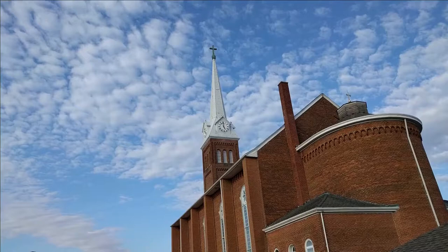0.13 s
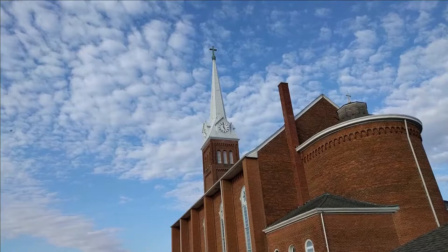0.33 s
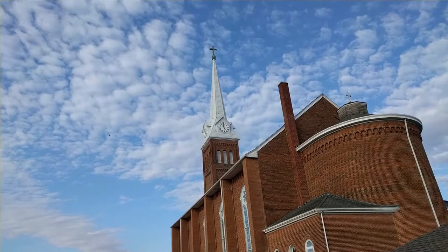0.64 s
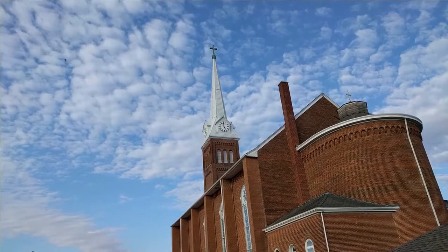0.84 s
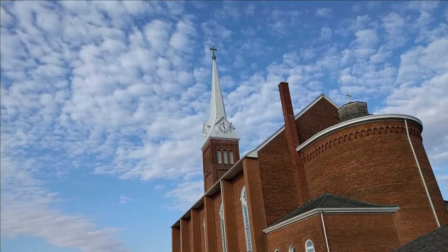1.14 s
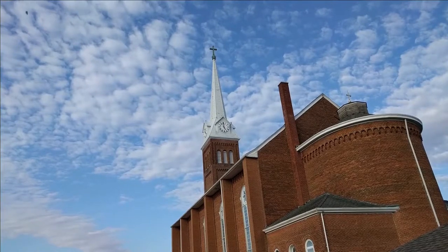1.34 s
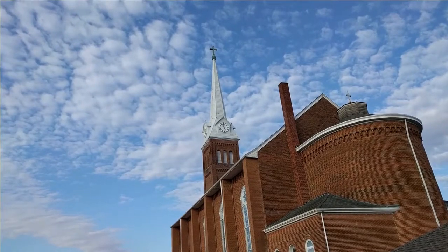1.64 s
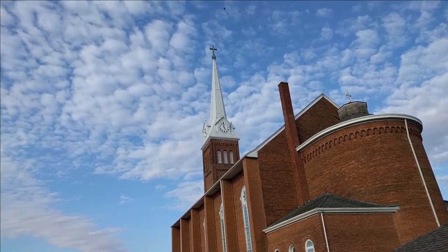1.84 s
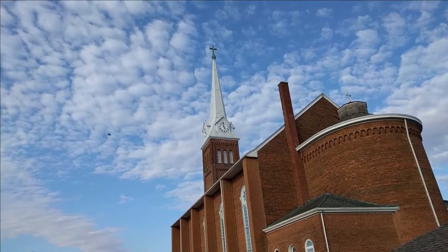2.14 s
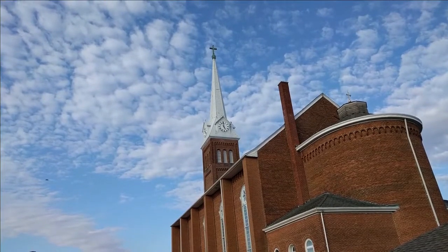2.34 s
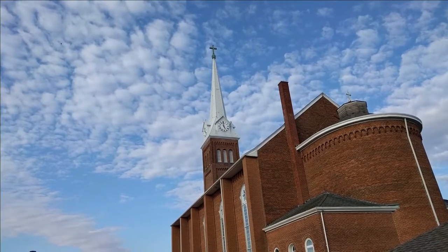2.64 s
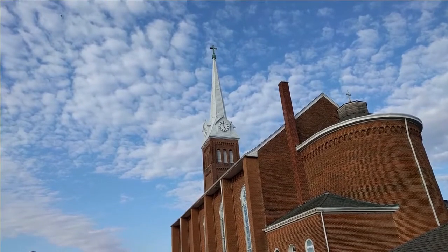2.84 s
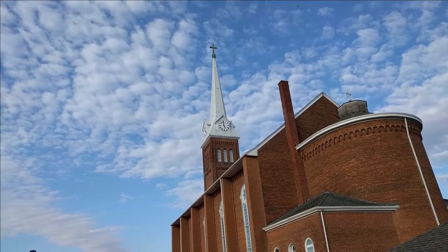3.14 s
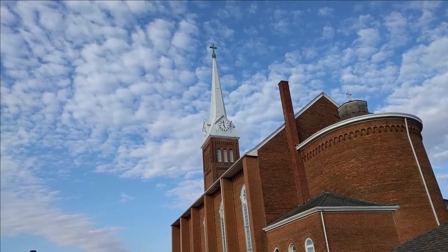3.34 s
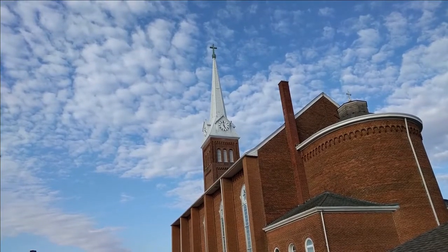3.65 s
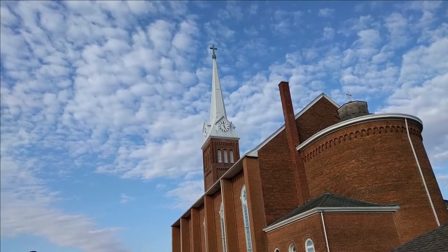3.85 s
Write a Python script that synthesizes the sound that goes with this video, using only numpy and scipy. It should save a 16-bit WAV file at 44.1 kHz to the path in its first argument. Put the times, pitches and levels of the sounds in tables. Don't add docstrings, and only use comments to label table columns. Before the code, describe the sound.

A distant church bell is struck once and rings on over a quiet town with birds.

```python
import sys
import numpy as np
from scipy import signal
from scipy.fft import rfft, irfft
from scipy.io import wavfile
from scipy.ndimage import uniform_filter1d

SR = 44100
rng = np.random.default_rng(int(sys.argv[2]) if len(sys.argv) > 2 else 0)


def output_pcm(signal):
    pcm = np.clip(np.atleast_2d(signal).T, -1, 1) * 32767
    wavfile.write(sys.argv[1], SR, np.round(pcm).astype(np.int16))


def invert_db(x):
    u = np.asarray(x, float) / 20
    return 10 ** u


N = 176400
STRIKE_S = 2.43


def read(points, hz):
    f, value = np.transpose(points)
    return np.interp(np.log(hz + 1), np.log(f + 1), value)


def evened(x):
    return x / np.sqrt(np.mean(x ** 2) + 1e-20)


def coloured(shape):
    spectrum = rfft(rng.standard_normal(N))
    return evened(irfft(spectrum * invert_db(read(shape, np.fft.rfftfreq(N, 1 / SR))), N))


def wander(rate, count):
    t = np.arange(count)[:, None] / SR
    f = rate * np.geomspace(.1, 1, num=8)
    slow = np.sin(2 * np.pi * (f * t[::100] + rng.random(8))) @ (1 / np.sqrt(f))
    return np.interp(t[:, 0], t[::100, 0], evened(slow))


def glide(hz):
    return np.sin(2 * np.pi * np.cumsum(hz) / SR)


def add(mix, s, sound):
    part = mix[round(s * SR):][:len(sound)]
    part += sound[:len(part)]


def rumble():
    # [f/Hz, level/dB per Hz]
    rumble_colour = [(12, -43), (20, -35), (22, -40), (40, -5.5), (64, 0), (97, -8.5), (149, -15),
                     (400, -38.5), (520, -39), (880, -120)]
    # [t/s, level/dB]
    gusts = [
        (0.13, -53),
        (0.2, -56.5),
        (3.23, -53),
        (3.36, -55),
        (3.54, -51),
        (3.59, -59),
        (3.68, -50.5),
        (3.72, -55.5),
        (4.0, -54.5),
    ]
    # [t/s, depth/dB, half width/s]
    lulls = [
        (.235, -4.5, 0.018),
        (.28, -15, 0.013),
        (.4, -1, 0.072),
        (.555, -12, 0.016),
        (.81, -13, 0.013),
        (1.42, -2, 0.023),
        (2.17, -13, 0.014),
        (3.59, -2, .03),
    ]
    skew = 0.097
    t = np.arange(N) / SR
    low = coloured(rumble_colour)
    low = low / np.sqrt(uniform_filter1d(low ** 2, size=5000) + 0.12)
    level_db = np.interp(t, *np.transpose(gusts))
    for s, db, half in lulls:
        level_db = level_db + db * np.exp(-((t - s) / half) ** 2)
    cut = signal.butter(2, 36, "high", fs=SR, output="sos")
    even_part = signal.sosfilt(cut, low[::-1])[::-1]
    lopsided_part = signal.sosfilt(cut, low ** 2)
    return invert_db(level_db) * evened(even_part - skew * lopsided_part)


def town():
    # [f/Hz, level/dB per Hz]
    town_colour = [(120, -28), (200, 2), (379, -7.5), (573, -8), (1310, -15.5), (1640, -21.5), (1820, -28),
                   (6000, -33), (7800, -94), (13200, -120)]
    town_db = -67.5
    lull_s, lull_db, lull_half_s = 0.13, -3, 0.12
    lull = lull_db * np.exp(-((np.arange(N) / SR - lull_s) / lull_half_s) ** 2)
    return invert_db(town_db + lull) * coloured(town_colour)


def high_bands():
    # [f/Hz, width/Hz, level/dB]
    fuzzy_bands = [
        (7550, 200, -82.5),
        (7100, 400, -86),
    ]
    hz = np.fft.rfftfreq(N, 1 / SR)
    out = np.zeros(N)
    for f, width, db in fuzzy_bands:
        resonance = 1 / (1 + (2 * (hz - f) / width) ** 2)
        band = irfft(rfft(rng.standard_normal(N)) * resonance, N)
        out += invert_db(db + 2.4 * wander(23.0, count=N)) * evened(band)
    return out


def whistle():
    # [t/s, f/Hz, level/dB]
    whistle_course = [
        (0.885, 3950, -88),
        (0.895, 4549, -71),
        (0.902, 4550, -61.5),
        (0.937, 4374, -53.5),
        (0.985, 4346, -56),
        (1.063, 4184, -62.5),
        (1.111, 4170, -100),
        (1.12, 4300, -82),
    ]
    s, hz, db = np.transpose(whistle_course)
    t = np.arange(s[0], s[-1], 1 / SR)
    edge = np.minimum(1, np.minimum(t - s[0], s[-1] - t) / 0.0072)
    level_db = np.interp(t, s, db) + 0.83 * wander(55.0, count=len(t))
    out = np.zeros(N)
    add(out, s[0], np.sqrt(2) * edge * invert_db(level_db) * glide(np.interp(t, s, hz)))
    return out


def chirps():
    # [t/s, length/s, from f/Hz, to f/Hz, level/dB]
    chirp_notes = [(.335, .016, 6700, 7300, -68), (.67, .2, 4170, 4350, -83), (1.12, .17, 4280, 4230, -84),
                   (1.215, .014, 4000, 4400, -72), (1.318, .024, 4050, 4600, -69),
                   (1.35, .025, 4900, 4950, -77), (1.24, .03, 5350, 5450, -81),
                   (1.455, .02, 4250, 4500, -76), (1.35, .012, 4100, 4400, -72),
                   (1.38, .055, 2750, 2720, -76), (1.425, .024, 4000, 4600, -69.5),
                   (1.545, .015, 4000, 4150, -74), (1.65, .03, 4080, 4180, -72),
                   (1.79, .012, 4000, 4100, -77), (1.675, .015, 4800, 5000, -77),
                   (1.76, .025, 3950, 4200, -73), (1.785, .016, 4900, 5300, -75),
                   (2.11, .03, 3500, 3200, -79), (2.185, .014, 5900, 7000, -71),
                   (3.05, .04, 4060, 4050, -78), (3.985, .015, 6200, 6900, -69)]
    out = np.zeros(N)
    for start, length, from_hz, to_hz, db in chirp_notes:
        u = np.arange(0, length, 1 / SR) / length
        blur = .014 * from_hz * wander(300., count=len(u) + 200)[:len(u)]
        blur *= min(1, .02 / length)
        swell = np.sqrt(2 * np.sin(np.pi * u))
        add(out, start, invert_db(db) * swell * glide(from_hz + (to_hz - from_hz) * u + blur))
    return out


def birds():
    calls = whistle() + chirps()
    t = np.arange(SR // 3) / SR
    echo = rng.standard_normal(len(t)) * invert_db(-60 * t / 0.28) * (t > .004)
    return calls + invert_db(-11) * signal.fftconvolve(calls, echo / np.linalg.norm(echo))[:N]


def ticks():
    # [t/s, peak level/dB, f/Hz, share of dull knock]
    body_ticks = [
        (.6352, -45, 7500, .1),
        (.6634, -42.5, 7500, .1),
        (.9576, -36, 7300, .3),
    ]
    out = np.zeros(N)
    t = np.arange(-24, 25) / SR
    for s, db, hz, dull in body_ticks:
        snap = (1 - 2 * (np.pi * hz * t) ** 2) * np.exp(-(np.pi * hz * t) ** 2)
        knock = np.cos(2 * np.pi * 1500 * t) * np.exp(-(t / .0002) ** 2)
        train = .13 * rng.standard_normal(90) * invert_db(-np.arange(90) * .2)
        train[[0, 7, 16, 20]] += [1, -.3, -.45, .35]
        add(out, s, invert_db(db) * np.convolve(train, snap + dull * knock))
    return out


def shimmer(hz, count):
    return 1.1 * hz / 2000 * wander(45., count=count)


def rim(t):
    # [f/Hz, peak level/dB, t60/s]
    rim_partials = [(215.26, -49.7, 90), (409.03, -50.7, 90), (486.85, -40, 9.9), (648.5, -64.5, 5.1),
                    (789.41, -41.8, 4), (1001.66, -49, 1.5), (1163.75, -53.5, 12), (1592.13, -39.8, 3.1),
                    (1800.87, -55, 2.2), (2062.94, -55, 10), (2437.07, -53.5, 1.74), (2563.19, -55.6, 3.15),
                    (3086.09, -49.5, 1.75), (3616.6, -63.5, 4.5)]
    # [split f/Hz, peak level/dB, t60/s, t after the blow when the pair cancels/s]
    rim_twins = [(-.25, -62.6, 90, -.15), (-.77, -55.4, 1.95, .46), (-.21, -46.7, 2.64, -.35),
                 (-1.06, -63.3, 6.2, .66), (-1.05, -53, 9.5, .96), (2, -76, 27, -.01), (-.9, -54, .9, .6),
                 (.8, -59.5, 6.9, 1.4), (2.1, -72, 5.6, -.07), (-1.06, -66, 6, .95),
                 (-1.2, -67.5, 2.9, .43), (.92, -57, 4, .3), (-13, -67, 2.2, .02), (1.35, -78, 2.4, .98)]
    # [partial index, t/s, step/dB]
    partial_steps = [(4, 2.58, 1.5), (4, 2.8, -2.5), (4, 2.97, -2), (4, 3.17, 5), (4, 3.38, 2.5),
                     (4, 3.58, -5.5), (6, 3.17, -9), (6, 3.35, -4), (6, 3.67, 8), (7, 2.67, 1.5),
                     (7, 2.95, -2.5), (7, 3.27, 3), (7, 3.37, 1), (7, 3.53, -5), (7, 3.66, -7), (8, 3.3, 7),
                     (9, 3.27, -19), (9, 3.4, 7), (11, 3.2, -2), (11, 3.4, -2), (11, 3.6, 4),
                     (12, 2.57, -2.5), (12, 3.37, 5), (13, 3.1, -5)]
    shade_db = np.zeros((len(rim_partials), len(t)))
    for k, s, db in partial_steps:
        shade_db[k] += db / (1 + np.exp((s - STRIKE_S - t) / .025))
    out = np.zeros(len(t))
    for shade, partial, twin in zip(shade_db, rim_partials, rim_twins):
        hz, db, t60 = partial
        split, twin_db, twin_t60, dip = twin
        phase = 2 * np.pi * (hz * t + rng.random())
        twin_phase = phase + 2 * np.pi * split * (t - dip)
        pair = invert_db(db - 60 * t / t60) * np.sin(phase)
        pair -= invert_db(twin_db - 60 * t / twin_t60) * np.sin(twin_phase)
        out += pair * invert_db(shade + shimmer(hz, len(t)))
    return out


def lesser_partials(t):
    # [f/Hz, peak level/dB, t60/s]
    weak_partials = [(1095.2, -56, 1.2), (1110.7, -64.5, 9), (1118.8, -60, 2.4), (1395.6, -67, 6.6),
                     (1505.4, -59, 1.9), (1868.9, -62, 1.3), (1898, -57, 1.4), (2017.5, -62, 2.2),
                     (2264, -60, .8), (2407.1, -59, 2.2), (2700.2, -57, .74), (2779, -63, 2.3),
                     (2808, -61, .9), (2928.7, -66.5, 2.2),
                     (1109.5, -54, .7), (1579, -63, .8), (1619, -63, .8), (1729, -68, .9), (1843, -69, 2.2),
                    (2014, -62, .5), (2122, -68, .9), (2533, -70, 2.5), (2859, -65.5, 1.3),
                    (3136, -62, 1.8), (3546, -70, 3), (3603, -66, 1.8),
                     (3105, -57, .7), (3562, -57, .8), (3654, -66, 2.2), (3679, -69, .7),
                         (3769, -67, 2.2), (3961, -64, .6), (4157, -59, 1.3), (4168, -71, .8),
                         (4237, -66, .6), (4395, -68, .5), (4494, -71, 2), (4694, -70, .7), (5118, -65, .6),
                         (5230, -73, .9)]
    out = np.zeros(len(t))
    for hz, db, t60 in weak_partials:
        level_db = db - 60 * t / t60 + shimmer(hz, len(t))
        out += invert_db(level_db) * np.sin(2 * np.pi * (hz * t + rng.random()))
    return out


def clang(t):
    # [f/Hz, level/dB]
    clang_colour = [(200, -18), (600, 6.5), (1500, 3), (2600, 5.5), (4000, 1), (5500, -12), (7300, -3),
                    (8200, -24)]
    # [f/Hz, t60/s]
    clang_decay = [(300, .27), (1500, .28), (4000, .38), (8000, .45)]
    clang_db, modes, build_s = -66, 240, .009
    u = rng.random((modes, 3))
    t = t[:SR // 2, None]
    hz = 200 + 8000 * u[:, 0] ** 2.2
    t60 = read(clang_decay, hz) * (.5 + u[:, 1])
    level_db = clang_db + read(clang_colour, hz) - 60 * t / t60
    crowd = (invert_db(level_db) * np.sin(2 * np.pi * (hz * t + u[:, 2]))).sum(1)
    t = t[:, 0]
    return crowd * np.cos(np.pi * t) ** .5 * (1 - np.exp(-t / build_s))


def scatter(t):
    # [f/Hz, level/dB per Hz]
    scatter_colour = [(400, -32), (700, -10), (1500, -1), (3000, 2), (4500, -9), (8000, -24)]
    scatter_db, t60, build_s = -67.5, 7.3, .04
    level = invert_db(scatter_db - 60 * t / t60) * (1 - np.exp(-t / build_s))
    return level * coloured(scatter_colour)[:len(t)]


def bell():
    build_s, direct, throw_s, throw_spread_s = .003, .33, .028, .006
    t = np.arange(N - round(STRIKE_S * SR)) / SR
    throw = (1 - direct) / (1 + np.exp((throw_s - t) / throw_spread_s))
    out = (rim(t) + lesser_partials(t)) * (1 - np.exp(-t / build_s)) * (direct + throw)
    add(out, 0, clang(t))
    return out + scatter(t)


def scene():
    mix = rumble() + town() + high_bands() + birds() + ticks()
    add(mix, STRIKE_S, bell())
    return mix[None]


def roll_off(x):
    return signal.sosfilt(signal.butter(12, 16340, fs=SR, output="sos"), x)


def record(dry):
    # [f/Hz, level/dB per Hz]
    hiss_colour = [(1000, 10.5), (3000, 3.5), (5800, 1), (7100, 5), (8200, 1), (12000, -1), (15500, 0.5)]
    hiss_db, knee_db, ceiling_db, hiss_power = -73.5, -72, 58, 0.39
    offset, offset_power = -0.00082, 0.18
    opens_s, edge_hz = .1203, 15780
    power = uniform_filter1d(dry ** 2, size=500, axis=1)
    power = abs(uniform_filter1d(power, size=500, axis=1))
    swing = np.minimum(1 + power / invert_db(2 * knee_db), invert_db(ceiling_db))
    creep = offset * uniform_filter1d(swing, size=2500, axis=1) ** (offset_power / 2)
    hiss = invert_db(hiss_db) * swing ** (hiss_power / 2) * coloured(hiss_colour)
    band_edge = signal.firwin(401, edge_hz, window=("kaiser", 9), fs=SR)
    x = signal.oaconvolve(dry + creep + hiss, band_edge[None], "same")
    return roll_off(x * (np.arange(N) / SR > opens_s))


dry = scene()
out = record(dry)
output_pcm(out)
```